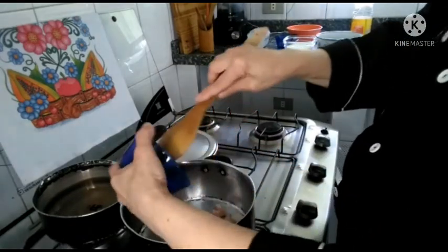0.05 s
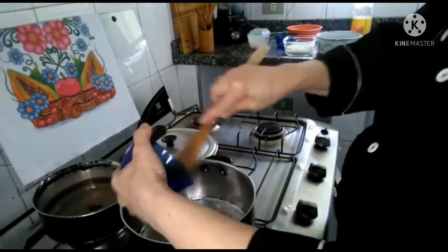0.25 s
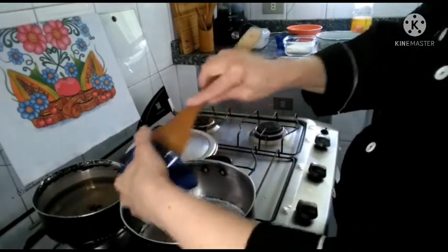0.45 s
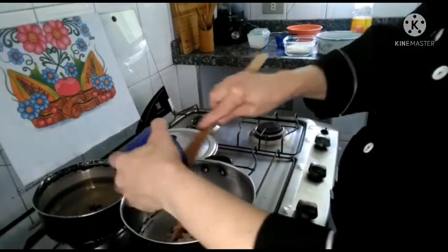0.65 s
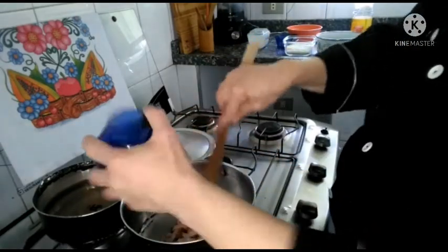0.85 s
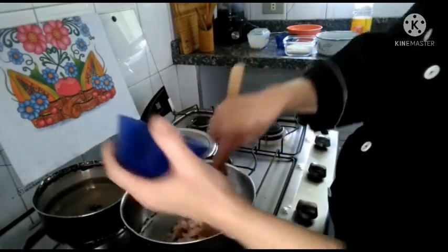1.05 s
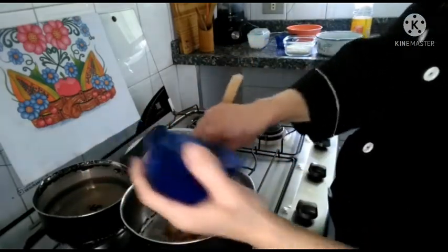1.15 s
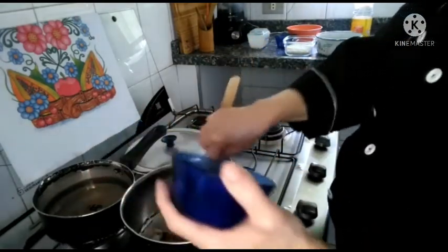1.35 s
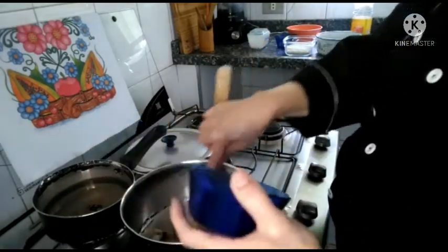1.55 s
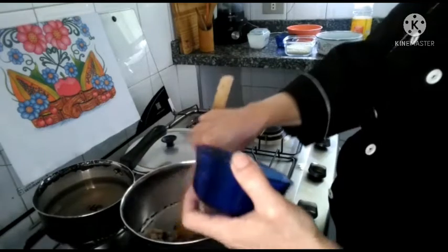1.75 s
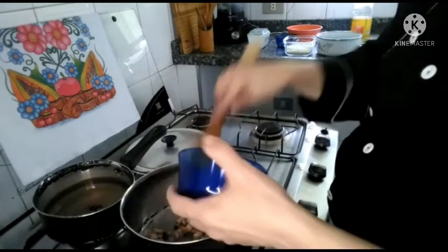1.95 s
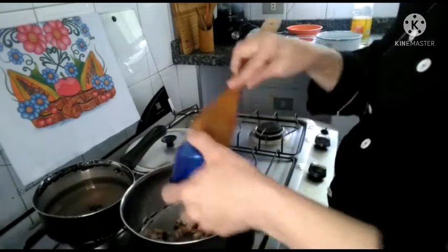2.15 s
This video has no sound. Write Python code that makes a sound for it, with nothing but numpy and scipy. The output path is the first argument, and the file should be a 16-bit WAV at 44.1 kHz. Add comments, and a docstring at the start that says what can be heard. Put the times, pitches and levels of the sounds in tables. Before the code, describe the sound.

Bacon sizzles and spits in hot fat while a wooden spoon knocks a bowl and steel pot

```python
"""Bacon hisses and fries throughout, while fat spits and a wooden spoon knocks a glass bowl and a steel pot.
Place: a kitchen, over a low rumble of flame and room. Fizz is shaped noise and ringing bubbles; pulses excite the pot's air.
Spits are cracks with a ringing bubble; knocks are struck modes with a crack and a rattle.
Microphone: two phone capsules, each losing a slightly delayed share of the other to widen the image."""
import sys
import numpy as np
from scipy import signal
from scipy.fft import rfft, irfft, next_fast_len
from scipy.io import wavfile

SR = 44100
rng = np.random.default_rng(int(sys.argv[2]) if len(sys.argv) > 2 else 0)


def generate_wav(sig):
    """Save sig (samples, or channels by samples) to the path in sys.argv[1] as 16-bit PCM at SR."""
    pcm = np.round(np.clip(np.atleast_2d(sig).T, -1, 1) * 32767).astype(np.int16)
    wavfile.write(sys.argv[1], SR, pcm)


def volts_from_db(level):
    """Convert decibel levels to linear amplitude ratios."""
    exponent = np.asarray(level, float) / 20
    return 10 ** exponent


N = 97020  # 2.2 s


def rms_one(x):
    """Scale to rms 1."""
    return x / np.sqrt(np.mean(x ** 2) + 1e-20)


def at_hz(points, hz):
    """Read a table on a log-frequency axis."""
    table_hz, values = np.array(points)[:, 0], np.array(points)[:, 1]
    return np.interp(np.log(hz), np.log(table_hz), values)


def drift(rate_hz):
    """Slow random wander of spread 1: noise through two equal poles at rate_hz, computed every 40 samples."""
    r = np.exp(-80 * np.pi * rate_hz / SR)
    noise = rng.standard_normal(N // 40 + 2002)
    slow = signal.lfilter([1], [1, -2 * r, r * r], noise)[2000:]
    return np.interp(np.arange(N) / 40, np.arange(len(slow)), rms_one(slow))


def ring(push, hz, t60):
    """A damped resonator: a unit click sets a sine of height 1 ringing."""
    r = volts_from_db(-60 / (max(t60, 1e-4) * SR))
    w = 2 * np.pi * hz / SR
    return signal.lfilter([0, np.sin(w)], [1, -2 * r * np.cos(w), r * r], push + 1e-18)


def late(x, lag_s, gain=1):
    """Delay by any fraction of a sample; gain may be a function of frequency."""
    size = next_fast_len(N + 256)
    hz = np.fft.rfftfreq(size, 1 / SR)
    weight = gain(hz + 1) if callable(gain) else gain
    return irfft(rfft(x, size) * weight * np.exp(-2j * np.pi * hz * lag_s), size)[..., :N]


def clicks_at(s, size):
    """A train of clicks at given times."""
    out = np.zeros(N)
    out[(np.asarray(s) * SR).astype(int)] = size
    return out


def sparse(per_s, spread_db):
    """Random clicks of uneven size and sign."""
    chance, size, sign = rng.random((3, N))
    level_db = spread_db * np.minimum(-np.log(size + 1e-9), 4.0)
    return (chance < per_s / SR) * volts_from_db(level_db) * np.sign(sign - .5)


def bands(spectrum, shape, alike):
    """Third-octave noise at two capsules; shape(hz) is a band's envelope, alike(hz) its correlation."""
    out, white = 0, rng.standard_normal((2, 2, N))
    edges = 28 * 2 ** np.arange(0, 9.4, 1 / 3)
    for k, (low, high) in enumerate(zip(edges, edges[1:])):
        hz = np.sqrt(low * high)
        if spectrum[0][0] * .8 < hz < spectrum[-1][0] * 1.2:
            band = signal.butter(2, [low, high], "band", fs=SR, output="sos")
            mid, side = signal.sosfilt(band, white[k % 2])
            c = np.clip(alike(hz), -1, 1)
            pair = np.sqrt(1 + c) * mid + np.sqrt(1 - c) * side * [[1], [-1]]
            out = out + volts_from_db(at_hz(spectrum, hz)) * shape(hz) * pair
    return out


# Flame and room. Each row: frequency in Hz, relative level in dB per Hz.
FLOOR_SPECTRUM = [(30, -32), (45, 0.5), (130, 7), (300, 6.5), (500, 0), (900, -13.5), (1300, -102)]
# Likeness of that floor at the two capsules. Each row: frequency in Hz, correlation.
FLOOR_LIKENESS = [(40, 0.57), (150, 0.93), (500, 0.6)]


def flame_and_room():
    """Low noise whose bands each waver on their own."""
    noise = bands(FLOOR_SPECTRUM, lambda hz: volts_from_db(3.13 * drift(21.0)), lambda hz: at_hz(FLOOR_LIKENESS, hz))
    return volts_from_db(-52) * rms_one(noise)


def kitchen(x):
    """Room reverberation: eight feedback delays a side, duller on every round."""
    t60_s, wall_cut_hz, room_db = 0.57, 9700, -23.5
    size = next_fast_len(N + SR)
    z = np.exp(-2j * np.pi * np.fft.rfftfreq(size))
    dull = np.exp(-2 * np.pi * wall_cut_hz / SR)
    out = np.zeros((2, len(z)), complex)
    lags = (rng.uniform(.006, .03, size=16) * SR).astype(int)
    for k, lag in enumerate(lags):
        loop = volts_from_db(-60 * lag / SR / t60_s) * (1 - dull) / (1 - dull * z) * z ** lag
        out[k % 2] += loop / (1 - loop) * (-1) ** (k // 2)
    return volts_from_db(room_db) * irfft(out * rfft(x, size), size)[:, :N]


# Narrow dips of the phone's stereo widening. Each row: frequency in Hz, width in Hz, depth in dB.
MIC_DIPS = [(2252, 123, -8), (4580, 92, -8)]


def dipped(x):
    """Two narrow dips from the phone's stereo widening, applied to the frying and the rattles."""
    def gain(hz):
        return volts_from_db(sum(db * np.exp(-((hz - at) / width) ** 2) for at, width, db in MIC_DIPS))
    return late(x, 0, gain)


def fall(s, size, t60):
    """Clicks that each die away exponentially."""
    return signal.lfilter([1], [1, -volts_from_db(-60 / (t60 * SR))], clicks_at(s, size) + 1e-18)


# Rattle after a knock. Each row: frequency in Hz, relative level in dB.
RATTLE = [(250, 3), (600, -3.5), (1300, -5), (3000, 1.5), (6000, -6.5), (14000, -36)]
# Decay of the rattle. Each row: frequency in Hz, 60 dB fall time in seconds.
RATTLE_T60 = [(300, 0.5), (700, 0.25), (1500, 0.33), (6000, 0.17), (14000, .1)]
# Likeness of the rattle at the two capsules. Each row: frequency in Hz, correlation.
RATTLE_LIKENESS = [(300, 0.94), (1200, 0.22), (3000, 0.12)]


def knocks(rows, modes, high_modes, low_cut_hz):
    """Every blow strikes the modes near its favoured pitch hardest, cracks, and leaves a rattle that dies by band."""
    spread_db, lag_s = 2, 0.00021
    waver_db, waver_hz = 4, 30
    rattle_sag = 1.35  # the rattle sits this factor below the favoured pitch
    s, db, pitch_hz, octaves, tail_db, crack_db = np.transpose(rows)

    def near(hz):
        return -6 * (np.log2(hz / pitch_hz) / np.maximum(octaves, .1)) ** 2

    luck = spread_db * rng.standard_normal((len(s), len(modes) + len(high_modes)))
    body = np.zeros(N)
    for k, (hz, level_db, t60) in enumerate(modes):
        strike = clicks_at(s, volts_from_db(db + level_db + near(hz) + luck[:, k]))
        # food and oil sliding about make each mode swell and sink
        waver = volts_from_db(waver_db * np.clip(drift(waver_hz), -2, 1))
        body += ring(strike, hz, t60) * waver
    for k, (hz, level_db, t60) in enumerate(high_modes):
        strike = clicks_at(s, volts_from_db(db + crack_db + level_db + luck[:, -1 - k]))
        body += ring(strike, hz, t60)
    body = signal.sosfilt(signal.butter(2, low_cut_hz, "high", fs=SR, output="sos"), body)
    bright_band = signal.butter(2, [1500, 13000], "band", fs=SR, output="sos")
    bright = signal.sosfilt(bright_band, rng.standard_normal(N))
    body = body + fall(s, volts_from_db(db + crack_db), 0.015) * bright

    def rattle_shape(hz):
        level_db = db + tail_db + 8.5 + 0.24 * near(hz * rattle_sag)
        return fall(s, volts_from_db(level_db), at_hz(RATTLE_T60, hz))

    rattle = bands(RATTLE, rattle_shape, lambda hz: at_hz(RATTLE_LIKENESS, hz))
    return np.array([body, late(body, lag_s)]) + dipped(rattle)


# Spoon taps on the glass bowl. Each row: start in seconds, strike level in dB, favoured pitch in Hz,
# octaves around it, rattle in dB (before an 8.5 dB lift) and crack in dB, both relative to the strike.
BOWL_TAPS = [(.2073, -3, 2800, 1.38, -25.5, -15), (.5132, -22.5, 2510, 0.98, -14, -3.5),
             (1.0787, -15.5, 3100, 0.41, -14.5, -13)]
# Modes of the glass bowl. Each row: frequency in Hz, level in dB, 60 dB fall time in seconds.
BOWL_MODES = [(357, -5, .25), (917, -12.5, 0.16), (1485, -16.5, 0.069), (1807, -1, 0.034),
              (2420, -33, 0.034), (2980, -28, 0.014), (3100, -9.5, 0.032), (3690, -13, 0.019),
              (3876, -6, 0.044), (4300, -10.5, 0.022), (5350, -40, 0.049), (6420, -24, 0.055)]


def bowl_taps():
    """The wooden spoon knocks the bowl it is scraped from; the glass rings in its modes."""
    return knocks(BOWL_TAPS, BOWL_MODES, [], low_cut_hz=1540)


# Spoon knocks on the steel pot. Each row: start in seconds, strike level in dB, favoured pitch in Hz,
# octaves around it, rattle in dB (before an 8.5 dB lift) and crack in dB, both relative to the strike.
POT_KNOCKS = [(.184, -29, 1290, 0.22, -27, -4), (0.2457, -7, 845, 0.75, -27, -6),
              (.544, -8, 1022, 0.12, -24, -24.5), (.578, -29.5, 1270, 0.22, -17, -18),
              (.615, -33.5, 1250, 0.85, -10, -12), (.658, -38, 1350, 0.21, -25, -2),
              (0.7255, -21, 1114, 0.1, -26, -22), (.742, -25, 647, 0.085, -30, -36),
              (.795, -43, 1280, 0.23, -25, -14), (.846, -25.5, 1340, 0.14, -25, -12.5),
              (1.05, -35, 1270, 0.12, -17, 4), (1.082, -24, 1280, 0.14, -25, -20),
              (1.0872, -18, 1260, 0.17, -34, -5), (1.0985, -29.5, 1320, 0.22, -22, 6.5),
              (1.112, -13.5, 947, .1, -24, -13), (1.135, -32.5, 1150, 0.42, -17, 4),
              (1.864, -35, 1300, 0.13, -31, -8)]
# Modes of the pot. Each row: frequency in Hz, level in dB, 60 dB fall time in seconds.
POT_MODES = [(367.5, -5, .2), (449, -19.5, 0.38), (506, -12, 0.059), (573, -19.5, 0.15), (606.3, -16, 0.25),
             (637.4, -18, 0.16), (704, -21, 0.15), (762.4, -23, 0.18), (857, -12.5, 0.036),
             (897, -23.5, 0.17), (944, -29, 0.21), (1004, -18, 0.048), (1173, -8, 0.034), (1240, -34, .3),
             (1248, -5.5, 0.064), (1360, -33, 0.067), (1570, -23, .25), (1773, -9, 0.098)]
# Short high modes woken by the crack. Each row: frequency in Hz, level in dB, 60 dB fall time in seconds.
POT_HIGH_MODES = [(3420, -30, 0.024), (4000, -10, 0.041), (5160, -11, 0.02), (5350, -6.5, 0.042),
                  (5880, -11, 0.031), (8080, -17, 0.022), (10140, -25.5, 0.053), (11700, -12, 0.027),
                  (13800, -14, .015)]


def pot_knocks():
    """The spoon strikes the steel pot: low modes ring by pitch, high ones with the crack."""
    return knocks(POT_KNOCKS, POT_MODES, POT_HIGH_MODES, low_cut_hz=313)


# Spits of fat. Each row: start in seconds, level in dB before a 6 dB cut, pitch in Hz,
# 60 dB fall time of the noise burst in seconds.
FAT_SPITS = [(0.079, -12.5, 7560, 0.036), (0.409, -25.5, 10300, 0.028), (0.443, -23.5, 8000, 0.054),
             (0.472, -16.5, 9000, 0.011), (0.5977, -15, 4630, 0.055), (0.771, -24, 8000, 0.016),
             (0.9197, -20.5, 3100, 0.014), (0.9588, -21, 8000, 0.014), (1.049, -16, 5460, 0.03),
             (1.163, -7.5, 10900, 0.012), (1.165, -11, 5600, 0.013), (1.3054, -15, 11400, 0.042),
             (1.3522, -8.5, 11200, 0.01), (1.3884, -16, 5300, 0.041), (1.4015, -13, 5000, 0.026),
             (1.493, -26, 3800, 0.022), (1.5412, -11.5, 4080, 0.066), (1.562, -11, 5300, 0.042),
             (1.6254, -15, 7600, 0.019), (1.6514, 4, 7100, 0.0061), (1.7453, -18, 5500, 0.014),
             (1.8339, -11, 4020, 0.011), (1.8706, -17, 8500, 0.0065), (1.92, -13.5, 6450, 0.01),
             (2.0, -26, 8000, 0.015), (2.0475, -16, 3180, 0.017), (2.136, -15.5, 10200, 0.014),
             (2.186, -12, 10100, 0.025)]


def spits():
    """Each spit is a short crack of bright noise and a bubble that rings; it nudges the air in the pot."""
    crack_db, air_db, air_t60_s = -19.5, -32, .015
    right_db, right_lag_s = -6, 0.00011
    out = np.zeros(N + SR)
    noises = np.diff(rng.standard_normal((len(FAT_SPITS), 2001)))  # differencing brightens
    t = np.arange(2000) / SR
    for (s, db, hz, t60), noise in zip(FAT_SPITS, noises):
        crack = noise * volts_from_db(-60 * t / max(t60, .001)) * np.minimum(t / 0.00021, 1)
        bubble = ring(crack, hz, 11.0 / hz)
        air = ring(crack, POT_AIR_MODES[0][0], air_t60_s)
        burst = bubble / abs(bubble).max() + volts_from_db(crack_db) * crack + volts_from_db(air_db) * air / abs(air).max()
        start = int(s * SR)
        out[start:start + 2000] += volts_from_db(db - 6.0) * burst
    left = out[:N]
    return np.array([left, volts_from_db(right_db) * late(left, right_lag_s)])


# Colour of the fizz. Each row: frequency in Hz, relative level in dB per Hz.
FIZZ_SPECTRUM = [(600, -1.5), (1000, -22.5), (2000, -2), (3500, -3), (5500, 2.5), (8000, 3.5), (11000, 3.5),
                 (15000, -2.5)]
# Likeness of the hiss at the two capsules. Each row: frequency in Hz, correlation.
FIZZ_LIKENESS = [(700, 0.2), (2000, 0.23), (5000, 0.43), (14000, 0.33)]


def hiss(swell):
    """Fine fizz as noise whose bands swell partly together, partly alone."""
    return rms_one(bands(FIZZ_SPECTRUM, lambda hz: volts_from_db(1.8 * swell + 1.87 * drift(24.0)),
                         lambda hz: at_hz(FIZZ_LIKENESS, hz)))


def bubbles(swell):
    """Bursting bubbles of 24 sizes around the pot floor, each ringing for a few cycles."""
    base_per_s, spread_db, cycles = 720, 3.5, 6.8
    burst = sparse(base_per_s * volts_from_db(6.7 * swell), spread_db)
    dealt = rng.integers(0, 24, N)
    grains = 0
    for k, hz in enumerate(np.geomspace(2500, 14000, num=24)):
        one = volts_from_db(at_hz(FIZZ_SPECTRUM, hz)) * hz * ring(burst * (dealt == k), hz, cycles / hz)
        # each size reaches the second capsule up to 12 samples early or late
        grains = grains + np.array([one, np.roll(one, rng.integers(-12, 13))])
    return rms_one(grains)


# Air resonances of the pot. Each row: frequency in Hz, width in Hz (raised to at least 110), level in dB.
POT_AIR_MODES = [(1298, 30, -0.5), (940, 50, -17.5), (1804, 470, -7), (3100, 430, -5.5), (3866, 83, -7.5)]


def pot_air():
    """Random pulses and a little noise set the air in the pot ringing."""
    base_per_s, least_width_hz = 220, 110
    push = sparse(base_per_s * volts_from_db(3.6 * drift(26.0)), 6.96) + 0.41 * rng.standard_normal(N)
    air = 0
    for hz, width, db in POT_AIR_MODES:
        t60 = np.log(1000) / (np.pi * max(width, least_width_hz))
        air = air + volts_from_db(db) * rms_one(ring(push, hz, t60))
    return rms_one(air)


# Vigour of the frying. Each row: time in seconds, fizz level in dB and pot-air level in dB, before trims.
VIGOUR = [(0.0, -48, -46.5), (0.13, -43.5, -49), (0.26, -43, -38.5), (0.39, -52, -48), (0.88, -50.5, -47),
          (1.08, -39.5, -41), (1.22, -37.5, -42.5), (1.45, -44.5, -47), (1.58, -39, -50.5),
          (1.69, -42, -47.5), (2.2, -42.5, -49.5)]
# The fat flares up as food lands or is turned. Each row: start in seconds, level in dB before trims,
# rise in seconds, 60 dB fall time in seconds.
FAT_FLARES = [(0.076, -32.5, 0.0031, 0.1), (0.467, -43, 0.0048, 1), (0.772, -40, 0.0053, 0.47),
              (1.046, -32, 0.0042, 0.049), (1.161, -31, 0.002, 0.14), (1.277, -29.5, 0.025, 0.56),
              (1.492, -38, 0.0028, 0.47), (1.537, -33.5, 0.0079, 0.66), (1.857, -34, 0.004, 0.17),
              (1.918, -36.5, 0.0017, 0.18), (1.997, -39, 0.0035, 0.43)]


def frying():
    """Hiss and bubbles follow the vigour and flares of the fat; the pot's air follows its own level."""
    hiss_db, bubbles_db, air_db = 2, -3, -4  # trims
    s, fizz_db, low_db = np.transpose(VIGOUR)
    t = np.arange(N) / SR
    fizz_level = volts_from_db(np.interp(t, s, fizz_db))
    air_level = volts_from_db(np.interp(t, s, low_db))
    for at, db, rise, t60 in FAT_FLARES:
        since = np.maximum(t - at, 0)
        flare = volts_from_db(db - 60 * since / max(t60, .02)) * np.minimum(since / max(rise, .001), 1)
        fizz_level = np.hypot(fizz_level, flare)
    swell = drift(23.0)
    fizz = volts_from_db(hiss_db) * hiss(swell) + volts_from_db(bubbles_db) * bubbles(swell)
    return fizz_level * fizz + air_level * volts_from_db(air_db) * pot_air()


def scene():
    """What reaches the two capsules; the room answers the spits and knocks heard at the left one."""
    events = spits() + bowl_taps() + pot_knocks()
    return dipped(frying()) + events + kitchen(events[0]) + flame_and_room()


def low_pass(x):
    """Removes everything above the highest recorded frequency."""
    return signal.sosfilt(signal.butter(12, 16390, fs=SR, output="sos"), x)


# Share of the other capsule taken away. Each row: frequency in Hz, share from left, share from right.
CAPSULE_SHARE = [(103, 0.27, 0.77), (450, 0.68, 0.91), (1250, 0.82, 1), (2320, 1, 0.99), (4500, 0.093, 1),
                 (8000, 0.31, 0.16), (14000, 0.19, 0.083)]


def record(dry):
    """Each side loses a delayed share of the other capsule; the lows and the top are cut."""
    lag_s, top_hz, low_cut_hz = 0.0004436, 14180, 45

    def share(hz):
        columns = np.array(CAPSULE_SHARE)
        return np.clip([at_hz(columns[:, [0, side]], hz) for side in (1, 2)], 0, 1)

    wide = dry - late(dry[::-1], lag_s, share)
    wide = signal.sosfilt(signal.ellip(8, .5, 55, top_hz, fs=SR, output="sos"), wide)
    wide = signal.sosfilt(signal.butter(2, low_cut_hz, "high", fs=SR, output="sos"), wide)
    return low_pass(volts_from_db(-3.0) * wide)


dry = scene()
out = record(dry)
generate_wav(out)
```